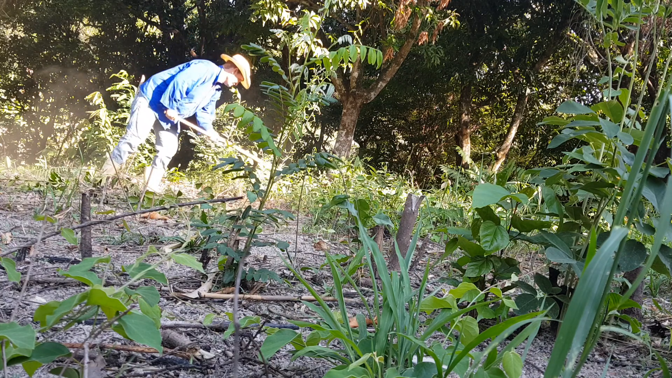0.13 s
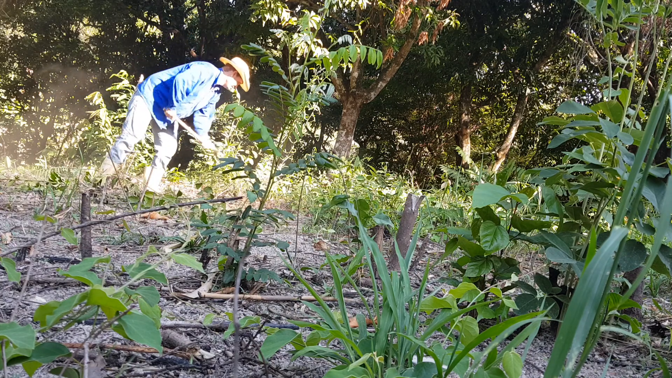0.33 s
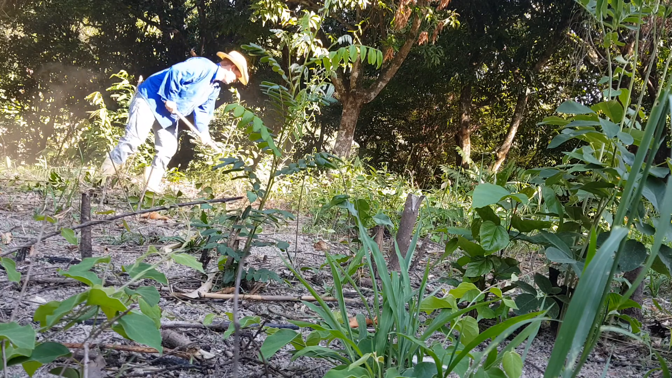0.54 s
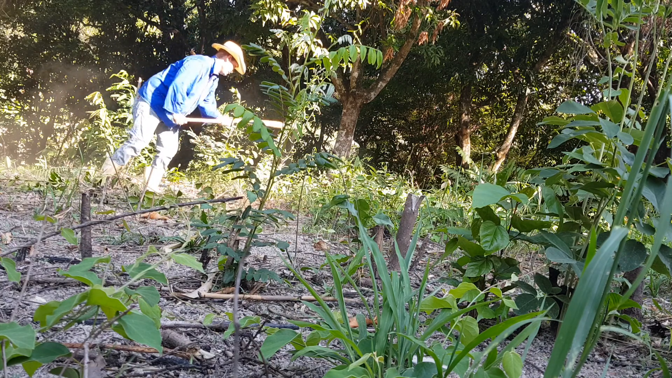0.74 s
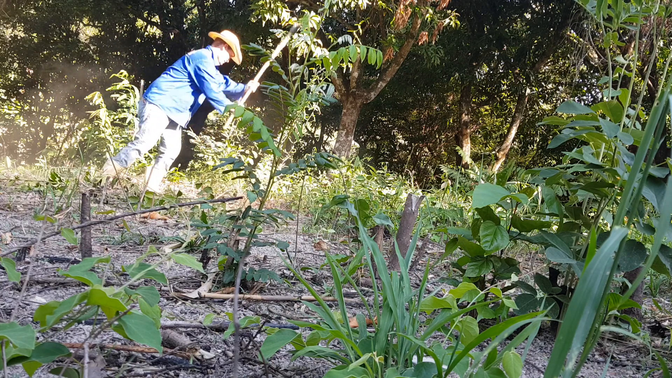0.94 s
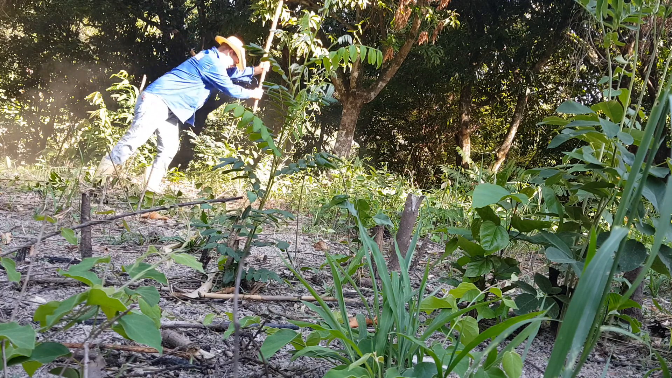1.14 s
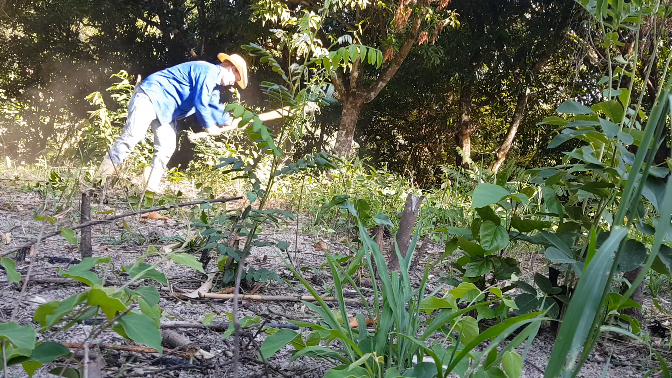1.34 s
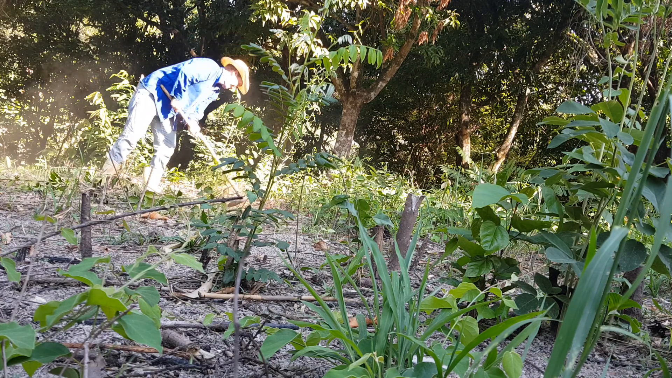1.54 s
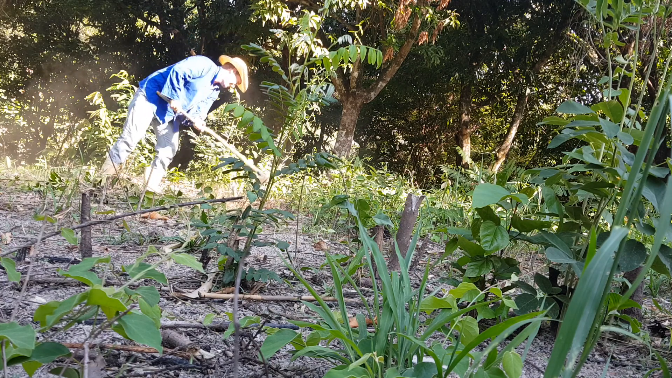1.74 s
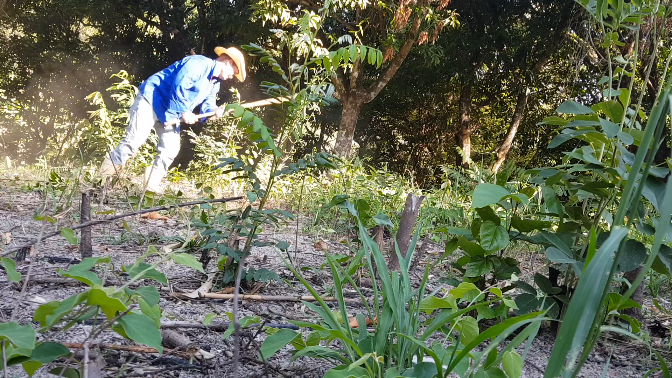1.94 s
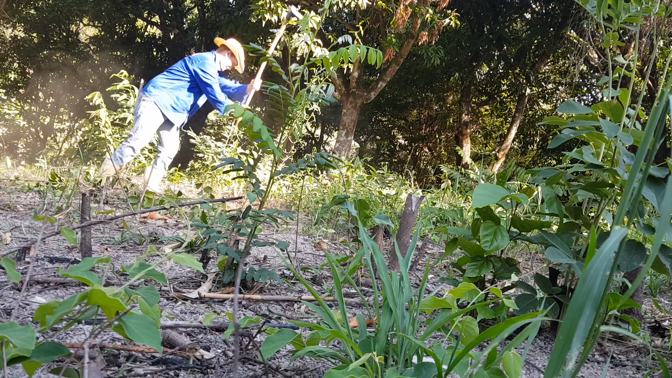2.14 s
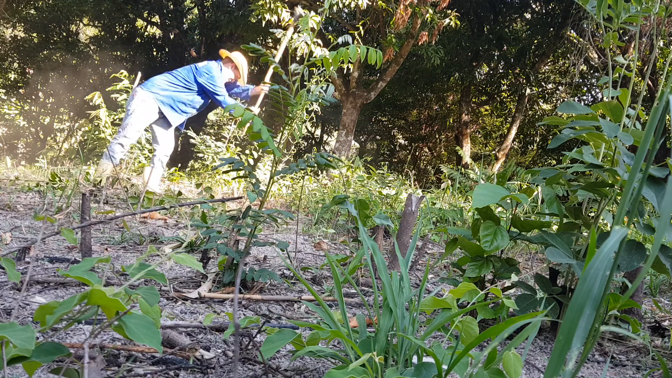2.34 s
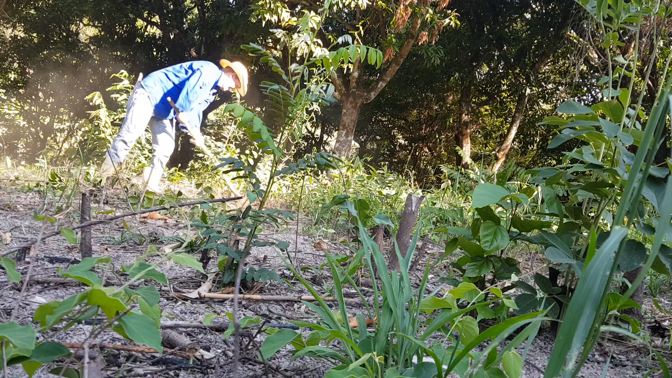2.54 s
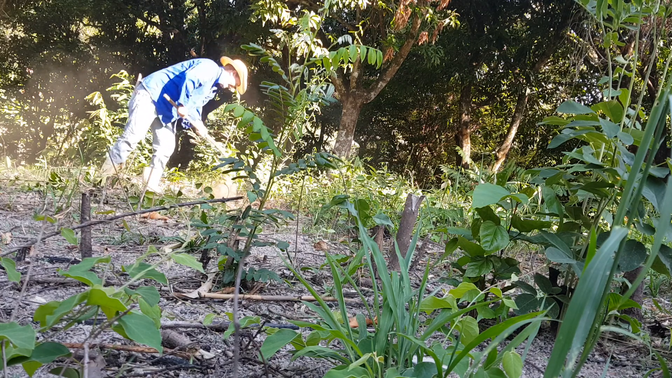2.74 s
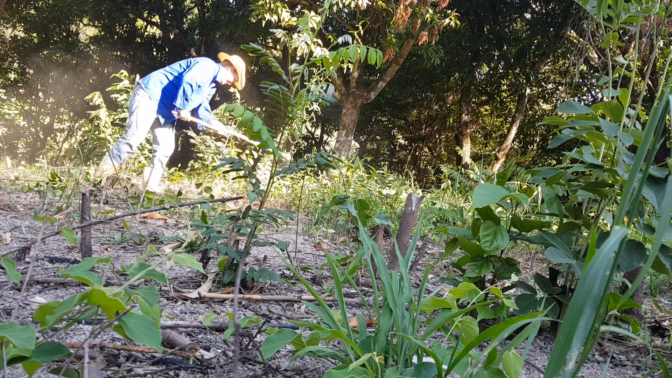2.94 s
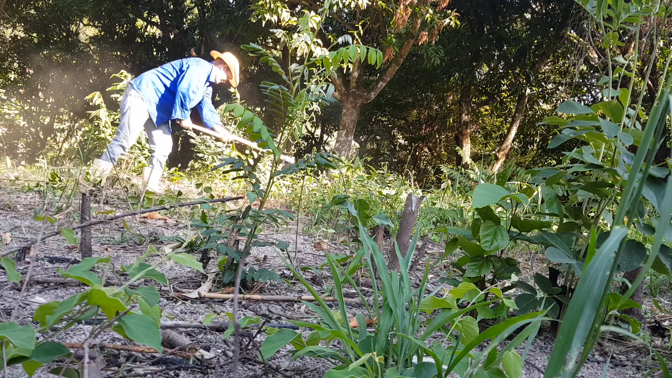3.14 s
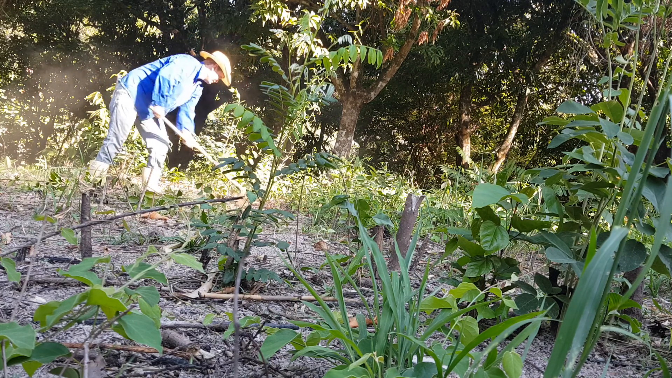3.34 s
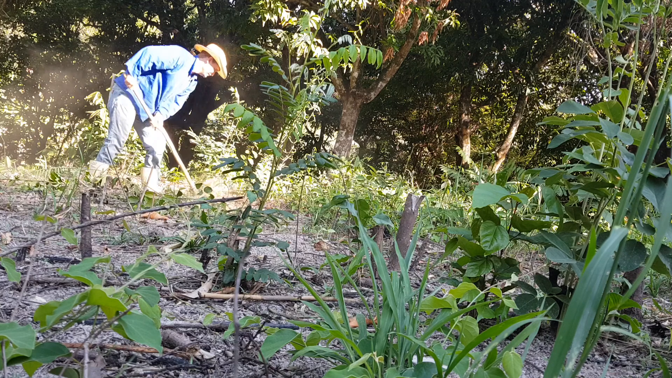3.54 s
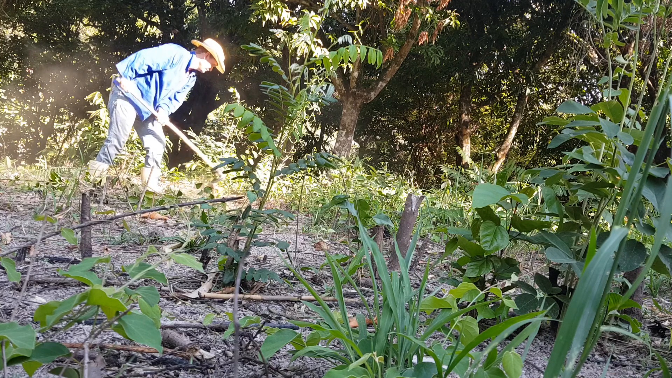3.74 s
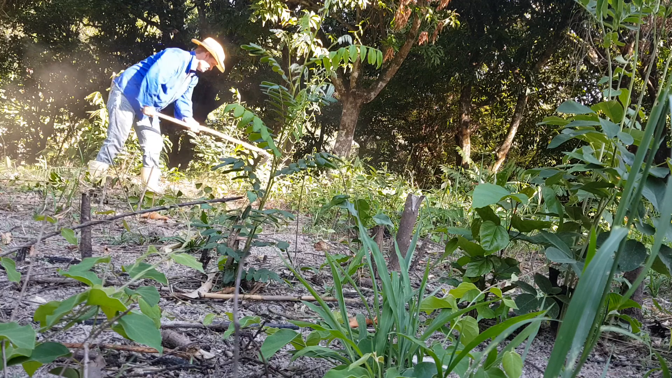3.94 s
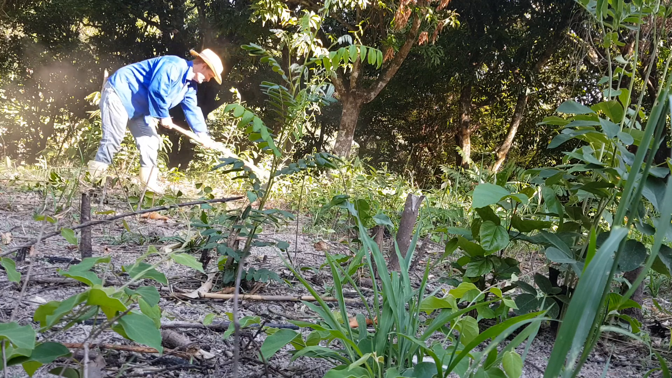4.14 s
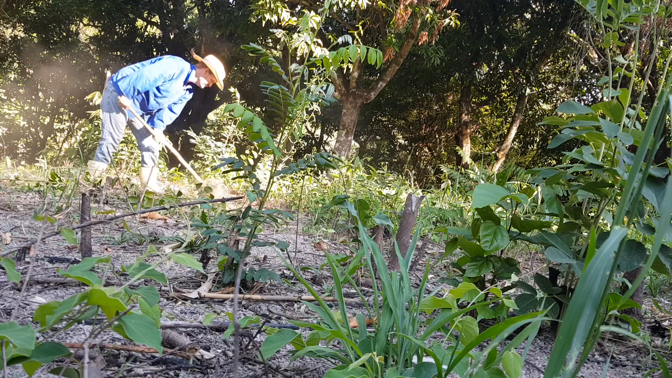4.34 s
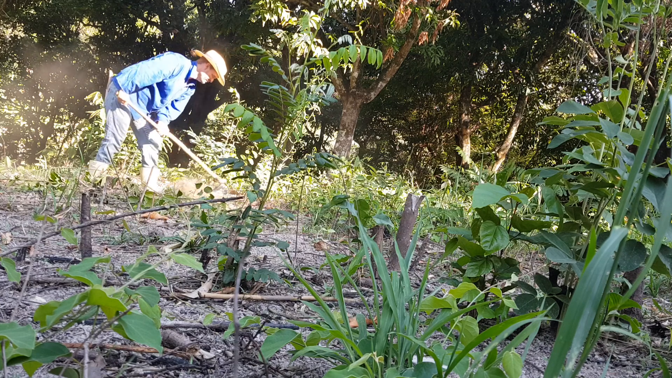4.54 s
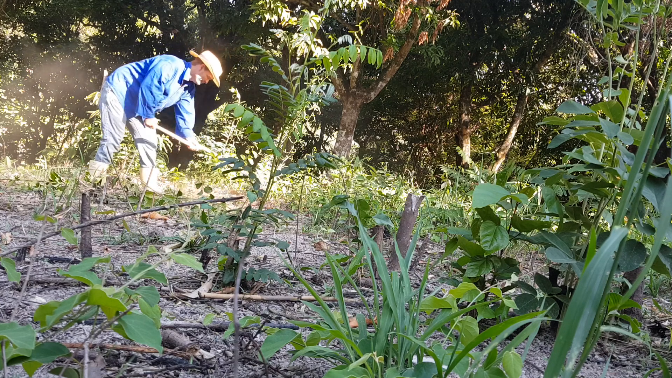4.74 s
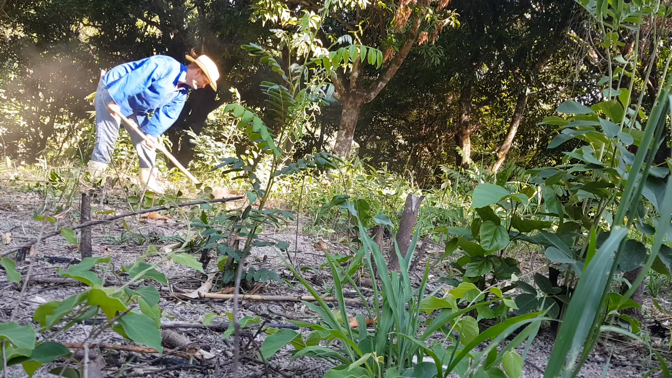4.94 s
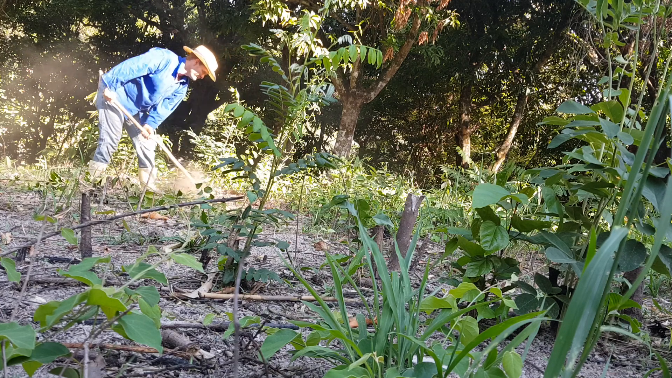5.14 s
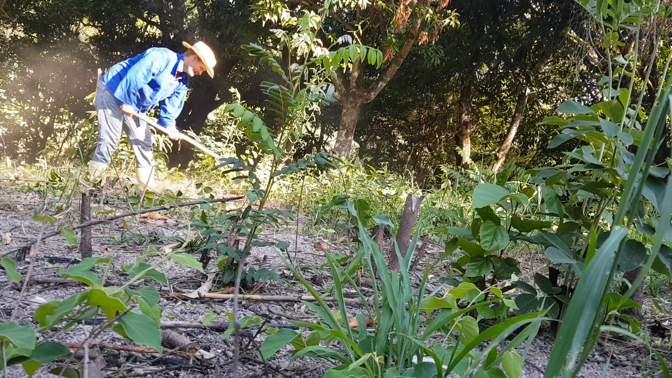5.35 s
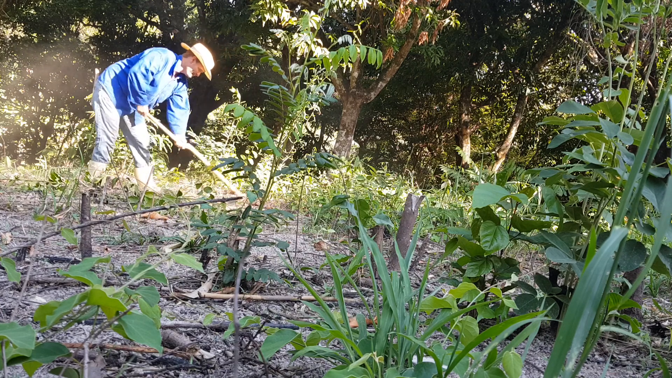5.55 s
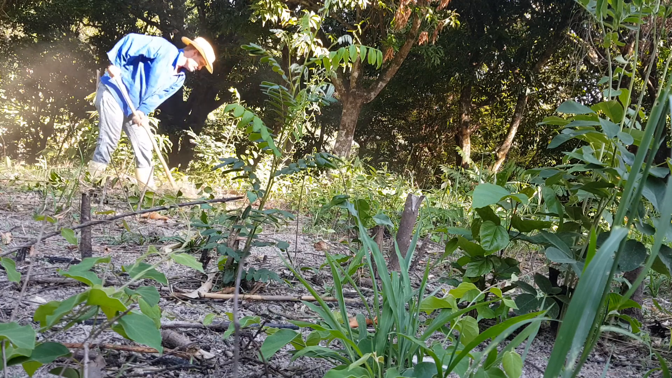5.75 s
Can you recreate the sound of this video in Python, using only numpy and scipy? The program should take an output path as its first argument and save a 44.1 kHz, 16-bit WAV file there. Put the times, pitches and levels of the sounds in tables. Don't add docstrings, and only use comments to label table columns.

```python
import sys
import numpy as np
from scipy import signal
from scipy.fft import rfft, irfft, next_fast_len
from scipy.io import wavfile
from scipy.ndimage import uniform_filter1d

SR = 44100
rng = np.random.default_rng(int(sys.argv[2]) if len(sys.argv) > 2 else 0)


def wav_record(signal):
    frames = np.transpose(np.atleast_2d(signal))
    bounded = np.clip(frames, -1, 1)
    quanta = np.round(bounded * 32767).astype(np.int16)
    wavfile.write(sys.argv[1], SR, quanta)


def rack_gain(trim_db):
    fader = np.asarray(trim_db, float)
    return 10 ** (fader / 20)


N = 259308
T = np.arange(N) / SR
COARSE = 16

# start_s, peak_db, dullness_db, rise_ms, fade_s
BLOWS = [(.375, -43, -32, 3, 0.04), (0.393, -33, -13, .8, 0.06), (1.4334, -38.5, -10, 0.7, 0.27),
         (1.4403, -26.5, 0, 0.16, 0.0095), (1.45, -22, -10, 2.2, 0.039), (1.456, -11.5, -5, 0.4, 0.017),
         (2.549, -37, -29, 1.2, 0.09), (2.5698, -8, -6, 6.6, 0.036), (2.5759, -16, 1.5, 0.51, 0.027),
         (3.3165, -28, -24, .5, 0.025), (3.323, -32.5, -15, .6, 0.057), (3.33, -27, -9, 0.71, 0.038),
         (3.3511, -32.5, 6, 0.54, 0.035), (3.3908, -27, 2.5, 0.75, 0.014), (4.809, -42.5, -11, 0.82, 0.042),
         (4.922, -34, -9.5, 2.3, 0.099), (4.262, -62, -24, 5.4, .08), (5.627, -39.5, -22, 0.5, 0.028),
         (5.739, -44, -35, 1.3, 0.025)]
# pitch_hz, level_db, fade_s
BLADE = [(942, -4, .06), (1514, -3, .07), (2084, -4, .07), (2291, 0, .08), (3956, -3, .06), (4518, -4, .08),
         (5453, -6, .05), (6821, -5, .05), (10500, -7, .03), (12340, -8, .03)]
RING_DB, RING_PER_DB = -5, 4.2

# start_s, peak_db,
# pitch_hz, fade_s
TICKS = [(0.3537, -46, 11600, .008), (0.37, -40, 6300, 0.014), (0.6, -44, 10800, 0.0073),
         (1.441, -27, 4600, 0.0059), (1.445, -51, 12100, .008), (1.455, -16.5, 12400, 0.049),
         (2.5525, -29, 5500, 0.011), (2.574, -30, 11200, 0.055), (2.81, -41, 10600, 0.018),
         (3.2975, -47, 11000, 0.007), (3.3949, -32.5, 11600, 0.03), (3.422, -39, 11000, .01),
         (5.3305, -36, 6300, 0.032), (5.4535, -32, 5000, 0.021), (5.424, -40, 6500, .015),
         (5.484, -50, 5400, .015), (5.7799, -31, 5600, 0.036), (5.7812, -35.5, 9800, 0.013),
         (5.782, -34, 14500, .02), (3.3072, -45, 10500, 0.0045), (4.926, -38.5, 10300, .02),
         (5.628, -54, 11000, 0.024), (2.576, -18.5, 2180, 0.036), (2.577, -28, 970, 0.034),
         (2.584, -31.5, 495, 0.019), (1.462, -32, 200, .03), (1.456, -31.5, 830, 0.016),
         (1.458, -31.5, 444, 0.031)]

# start_s, level_db, first_hz, fade_s, hollow_knock_db
THUMPS = [
    (0.406, -44, 94, 0.31, -3),
    (1.458, -24, 133, 0.25, -3),
    (1.582, -48, 76.5, 0.44, -30),
    (2.581, -26, 113, 0.15, 0),
    (2.719, -56, 75.6, 0.34, -23),
    (3.35, -28, 99, 0.067, -23),
    (4.285, -45, 89, 0.31, -30),
    (4.958, -59, 110, 0.16, -9),
    (5.677, -54.5, 111, 0.069, 6.5),
]
GROUND_HZ = 58.6
KNOCK_HZ, KNOCK_FADE_S = 230, 0.035

# start_s, crumbs_db, clods_db, rumble_db, hold_s
CUTS = [(.398, -40, -54, -40, 0.016), (1.465, -37.5, -40, -34.5, 0.019), (2.581, -35, -37.5, -37, 0.0077),
        (3.331, -34.5, -47.5, -37, 0.0042), (3.41, -62, -60.5, -67.5, 0.16),
        (4.262, -44.5, -50, -50.5, 0.03), (4.318, -70, -63.5, -68, 0.082), (4.933, -49.5, -52.5, -56, .003),
        (4.948, -53.5, -49, -56, 0.07), (4.992, -48, -67, -58.5, 0.046), (5.634, -50.5, -60, -80.5, .02),
        (5.66, -64, -59, -64, 0.048)]
CUT_RISE_S = 0.053
CUT_FADE_S = [0.18, 0.22, .22, 0.24]
CUT_DELAY_S = [0., .003, .008, .022]
CUT_LEAVES_DB = -2

# start_s (full level reached), crumbs_db,
# rise_s (over 60 dB), fade_s, coarseness_db
SHOWERS = [(.02, -51.5, 0.45, 0.2, -11), (.114, -68, 7, 2, 1), (.372, -50.5, 0.04, 0.4, -9.5),
           (.608, -58.5, 1.5, 0.26, -4.5), (.692, -60.5, 0.4, 0.33, -3), (1.666, -54, 1, 1.01, -8),
           (1.88, -66.5, 9, 0.53, 1), (2.65, -58.5, 4.5, 0.38, -6.5), (2.816, -53, 1, 1.27, -6),
           (3.064, -65, 4, 0.91, -3.5), (3.285, -64.5, 0.1, 1.1, 4.5)]
# start_s, crumbs_db, rise_s (over 60 dB), fade_s, coarseness_db
RAKES = [(3.39, -56.5, 4.9, 0.74, 5.5), (3.49, -44, 0.5, 0.74, -26), (3.535, -47, 0.3, 0.87, -2),
         (3.731, -54.5, 1, 1.52, -3.5), (4.111, -59, 0, 1.14, -1.5), (4.34, -50, 2.3, 2.35, -4.5),
         (4.52, -59.5, 4.5, 1.3, -14), (4.695, -50.5, 1.5, 0.32, -4.5), (4.822, -56, 0, 1.2, -3),
         (5.08, -56, 11, 0.9, -5.5), (5.218, -53, 0.5, 0.64, -10), (5.285, -51, 0.1, 1.2, -2),
         (5.42, -51, 1.5, 0.49, 0), (5.65, -64.5, -0.3, .8, 8), (5.785, -49, 0.6, 1.06, -2)]
CLODS_DB, CLODS_PER_COARSE, RUMBLE_DB = -15, 1.4, -27

# start_s, level_db
PUFFS = [(.988, -65), (1.335, -68), (2.076, -67), (2.434, -65.5), (3.157, -65), (4.25, -64.5)]
PUFF_RISE_S, PUFF_FADE_S, PUFF_CRUMBS_DB = 0.8, 0.58, -12.5

# pitch_hz, level_db
CRUMBS = [(6000, -40), (7200, -2.5), (7900, -9), (8800, -7.5), (10000, -2.5), (12500, 0), (15000, 3),
          (16100, -17.5)]
# pitch_hz, level_db
LEAVES = [(1300, -54), (2000, -6), (3200, -1.5), (4500, 4), (6200, 4.5), (7000, 1), (7500, -19),
          (8400, -51)]
# pitch_hz, level_db
CLODS = [(110, -3), (200, 1), (300, 0), (600, -6), (1000, -3), (1600, -0.8), (2300, 0), (4500, -4.5),
         (7000, -27)]
# pitch_hz, level_db
RUMBLE = [(25, -30), (45, 6.5), (72, 1.5), (110, 1.5), (200, -18), (350, -46.5)]

# pitch_hz, width_hz, level_db, left_minus_right_db, throb (0 to 1)
CRICKETS = [(3035, 50, -72, -6.5, 0), (3352, 40, -67.5, -1, 0.27), (3443, 110, -71.5, -4.5, 0.5),
            (3560, 22, -69.5, -7.5, 0.26), (5340, 43, -76, -8, 0.03), (5150, 180, -83, -8.7, 0)]
# pitch_hz, level_db
HAZE = [(2300, -20), (2900, -5), (3700, 3), (4300, 4.5), (5200, -6), (6400, -3), (7000, -19), (7350, -42),
        (8000, -48)]
# time_s, level_db
HAZE_LEVEL = [(0, -73.5), (.4, -59.5), (.8, -71), (1.05, -64.5), (1.2, -64), (1.4, -67.5), (1.6, -61.5),
              (1.9, -72), (2.1, -62.5), (2.25, -69.5), (2.45, -66.5), (3.1, -63), (3.3, -64), (4., -67),
              (4.6, -62), (5.35, -63.5), (5.88, -66.5)]
# start_s, length_s, pitch_hz, level_db
CHIRRS = [(1.05, .16, 5150, -69), (1.24, 0.099, 4950, -69), (2.043, .13, 4550, -74), (2.34, .14, 4200, -69),
          (3.068, .11, 4270, -62.5), (5.437, 0.06, 4280, -61)]
CHIRR_WIDTH_HZ = 350

# start_s, length_s, first_hz, last_hz, level_db
BIRD = [(.0, 0.077, 2230, 1674, -86), (0.45, .075, 2844, 2126, -68), (0.548, 0.099, 2480, 2090, -91),
        (0.95, 0.07, 2690, 2093, -72.5), (1.058, 0.1, 2330, 1864, -85.5), (1.924, 0.18, 2476, 1680, -78),
        (2.427, 0.17, 2880, 2570, -76)]
BIRD_PAN_DB = -5.5

# pitch_hz, level_db
AIR = [(25, -27.5), (45, -1), (86, -1.5), (300, -11.5), (900, -17.5), (2000, -24.5), (6800, -24.5),
       (7300, -46.5), (8800, -31.5), (12300, -17), (16000, -21)]
AIR_DB = -73

# pitch_hz, level_db
SHADOW = [(300, 1.2), (1000, -1.1), (4500, -3), (6500, -2.5), (8000, 5.5), (11000, 6), (15000, 0)]
PORT_LAG = 4
TOP_HZ = 16150


def blows():
    bright, dull, jolt = np.zeros((3, N))
    for start_s, db, dull_db, rise_ms, fade_s in BLOWS:
        i = int(start_s * SR)
        t = T[:min(SR // 3, N - i)]
        rise = (1 - np.exp(-t / max(rise_ms / 1000, 1e-4))) ** 2
        shape = rack_gain(db) * rise * fall(t, max(fade_s, .004))
        bright[i:i + len(t)] += shape
        dull[i:i + len(t)] += shape * rack_gain(dull_db)
        jolt[i:i + len(t)] += shape * rack_gain(RING_DB + RING_PER_DB * db)
    crush = grit(spread_db=3.0, alike=0.69)
    crunch = bright * unit(colour(crush, CRUMBS)) * rack_gain(-13.0)
    crunch = crunch + bright * unit(colour(crush, LEAVES)) * rack_gain(-5.5)
    knock = dull * unit(colour(grit(spread_db=3.0, alike=0.85), CLODS)) * rack_gain(-6.0)
    shake = jolt * grit(spread_db=1.5, alike=1.0)
    steel = sum(rack_gain(db) * ring(shake, hz, fade_s) for hz, db, fade_s in BLADE)
    near = crunch + knock + steel
    return near + rack_gain(-7) * trees(near, 0.5)


def ticks():
    out = np.zeros(N)
    t = T[:SR // 25]
    noises = rng.standard_normal((len(TICKS), len(t)))
    for (start_s, db, hz, fade_s), noise in zip(TICKS, noises):
        snap = np.diff(noise * fall(t, fade_s), 2, prepend=[0, 0])
        burst = ring(ring(snap, hz, 6. / hz), hz, 6. / hz)
        i = int(start_s * SR)
        out[i:i + len(t)] += rack_gain(db) * burst / np.abs(burst).max()
    near = np.array([out, np.roll(out, PORT_LAG)])
    return near + rack_gain(-8) * colour(trees(near, .22), [(500, -20), (2500, 0)])


def thumps():
    out = np.zeros(N)
    for start_s, db, first_hz, fade_s, knock_db in THUMPS:
        i = int(start_s * SR)
        t = T[:min(SR // 2, N - i)]
        hz = GROUND_HZ + (first_hz - GROUND_HZ) * np.exp(-t / 0.0216)
        swing = np.sin(2 * np.pi * np.cumsum(hz) / SR)
        wave = (1 - np.exp(-t / 0.0056)) * fall(t, fade_s) * swing
        knock = rack_gain(knock_db) * fall(t, KNOCK_FADE_S) * np.sin(2 * np.pi * KNOCK_HZ * t)
        out[i:i + len(t)] += rack_gain(db) * (wave + knock)
    return out * rack_gain(1.2 * walk(40))


def soil():
    fine, dry_leaf, heavy, deep = loads()
    patchy_db = 1.3 * walk(45)
    crumbs = unit(colour(grit(spread_db=2.0, alike=0.13), CRUMBS))
    crumbs = crumbs + rack_gain(-13.5) * colour(snaps(10160, 14900, rate=300, fade_s=0.0036), CRUMBS)
    leaves = unit(colour(grit(spread_db=-0.5, alike=0.12), LEAVES))
    leaves = leaves + rack_gain(-9.0) * colour(snaps(2280, 6670, rate=200, fade_s=0.0079), LEAVES)
    clods = unit(colour(grit(spread_db=1.5, alike=0.7), CLODS))
    rumble = unit(colour(rng.standard_normal(N), RUMBLE))
    bright = rack_gain(patchy_db - 1.18) * fine * crumbs + rack_gain(patchy_db + 3.5) * dry_leaf * leaves
    return bright + rack_gain(2.07 * walk(45) + 0.5) * heavy * clods + rack_gain(-4.5) * deep * rumble


def loads():
    clock = T[::COARSE]
    power = np.full((4, len(clock)), 1e-12)
    for start_s, crumbs_db, clods_db, rumble_db, hold_s in CUTS:
        leaves_db = (crumbs_db + clods_db) / 2 + CUT_LEAVES_DB
        layers_db = crumbs_db, leaves_db, clods_db, rumble_db
        power += [swell(start_s + delay_s, db, CUT_RISE_S, fade_s, hold_s) ** 2
                  for db, fade_s, delay_s in zip(layers_db, CUT_FADE_S, CUT_DELAY_S)]
    for start_s, db, rise_s, fade_s, coarse_db in SHOWERS + RAKES:
        clods_db = CLODS_DB + CLODS_PER_COARSE * coarse_db
        shares = rack_gain(np.array([0, coarse_db, clods_db, RUMBLE_DB]))
        thrown_s = max([0] + [cut[0] for cut in CUTS if cut[0] < start_s])
        landing = swell(start_s, db, rise_s, fade_s) * (clock >= thrown_s)
        power += np.outer(shares, landing) ** 2
    for start_s, db in PUFFS:
        puff = swell(start_s, db, PUFF_RISE_S, PUFF_FADE_S)
        power[:2] += np.outer([rack_gain(PUFF_CRUMBS_DB), 1], puff) ** 2
    return [np.interp(T, clock, gain) for gain in np.sqrt(power)]


def snaps(low_hz, high_hz, rate, fade_s):
    out = np.zeros((2, N))
    for hz in np.geomspace(low_hz, high_hz, 7):
        when, size = rng.random((2, 2, N), dtype=np.float32)
        clicks = (when < rate / SR) * (2 * size - 1) ** 3
        out += ring(clicks, hz, fade_s)
    return unit(out)


def insects():
    haze_db = np.interp(T, *np.transpose(HAZE_LEVEL)) + 0.63 * walk(19)
    out = rack_gain(haze_db) * unit(colour(rng.standard_normal((2, N)), HAZE))
    for hz, width_hz, db, pan_db, throb in CRICKETS:
        line = unit(ring(rng.standard_normal((2, N)), hz, 4.2 / width_hz))
        beat_hz = 27 + 2.586 * walk(2.4)
        beat = 1 + throb * np.sin(2 * np.pi * np.cumsum(beat_hz) / SR)
        drift_db = 1.7 * walk(1.3) + 0.34 * walk(20)
        out += rack_gain(db + drift_db + np.array([[pan_db], [-pan_db]]) / 2) * beat * line
    return out


def chirrs():
    out = np.zeros((2, N))
    noises = rng.standard_normal((len(CHIRRS), 2, SR // 4))
    for (start_s, length_s, hz, db), noise in zip(CHIRRS, noises):
        i, size = int(start_s * SR), min(int(length_s * SR), SR // 4)
        hiss = unit(ring(noise, hz, 4.8 / CHIRR_WIDTH_HZ))[:, :size]
        out[:, i:i + size] += rack_gain(db) * np.sin(np.pi * np.arange(size) / size) * hiss
    return out


def bird():
    out = np.zeros((2, N))
    pan_db = np.array([[BIRD_PAN_DB], [-BIRD_PAN_DB]]) / 2
    for start_s, length_s, first_hz, last_hz, db in BIRD:
        i = int(max(start_s, 0) * SR)
        along = T[:int(length_s * SR)] / length_s
        hz = last_hz + (first_hz - last_hz) * (1 - along) ** 0.8
        turn = 2 * np.pi * np.cumsum(hz) / SR
        whistle = np.sin(turn) + rack_gain(-9.5) * np.sin(2 * turn)
        note = np.sin(np.pi * along ** 1.25) ** 0.4 * whistle
        out[:, i:i + len(along)] += rack_gain(db + pan_db) * note
    out = out * (1.7 + 0.7 * walk(180))
    return out + rack_gain(4) * trees(out, 0.8)


def air():
    mid, left, right = rng.standard_normal((3, N))
    shared = colour(mid, [(150, -2.0), (1200, -14.0)])
    hush = unit(colour(shared + np.array([left, right]), AIR))
    return rack_gain(AIR_DB + 0.26 * walk(8.9)) * hush


def trees(x, fade_s):
    t = T[:SR // 2]
    tail = rng.standard_normal((2, len(t))) * fall(t, fade_s) * (t > .008)
    tail = tail / np.sqrt(np.sum(tail ** 2, axis=1, keepdims=True))
    return signal.fftconvolve(x, tail, axes=1)[:, :N]


def grit(spread_db, alike):
    size_db = np.clip(spread_db, 0, 7) * rng.exponential(size=N // 8 + 1)
    size = rack_gain(size_db).repeat(8)[:N]
    direct, left, right = size * rng.standard_normal((3, N))
    alike = np.clip(alike, 0, 1)
    straight = np.array([direct, np.roll(direct, PORT_LAG)])
    return np.sqrt(alike) * straight + np.sqrt(1 - alike) * np.array([left, right])


def swell(start_s, db, rise_s, fade_s, hold_s=0.):
    t = T[::COARSE]
    climb = np.maximum((start_s - t) / max(rise_s, .01), 0)
    decay = np.maximum((t - start_s - hold_s) / max(fade_s, .02), 0)
    return rack_gain(db - 60 * climb - 60 * decay)


def ring(x, hz, fade_s):
    r = np.exp(-np.log(1000) / (fade_s * SR))
    turn = 2 * np.pi * hz / SR
    return signal.lfilter([np.sin(turn) * np.sqrt(1 - r * r)], [1, -2 * r * np.cos(turn), r * r], x)


def fall(t, fade_s):
    return np.exp(-np.log(1000) * t / fade_s)


def walk(rate):
    k = int(SR / rate)
    steps = np.repeat(rng.standard_normal(N // k + 1), k)
    return unit(uniform_filter1d(uniform_filter1d(steps, k), k)[:N])


def colour(x, points):
    hz, db = np.transpose(points)
    size = next_fast_len(N)
    bins_hz = np.arange(size // 2 + 1) * SR / size
    gain = rack_gain(np.interp(np.log(bins_hz + 1), np.log(hz), db))
    return irfft(rfft(x, size) * gain, size)[..., :N]


def unit(x):
    return x / np.sqrt(np.mean(x ** 2))


def scene():
    left, right = blows() + ticks() + soil()
    mid = (left + right) / 2
    side = colour((left - right) / 2, [(120, -17.0), (700, 0.5)])
    hoe = np.array([colour(mid + side, SHADOW), mid - side])
    return hoe + thumps() + insects() + chirrs() + bird() + air()


def low_pass(x):
    return signal.sosfilt(signal.butter(12, 16810, fs=SR, output="sos"), x)


def record(dry):
    trimmed = signal.sosfilt(signal.butter(2, 42, "highpass", fs=SR, output="sos"), dry)
    mix = signal.sosfilt(signal.ellip(8, .2, 70, TOP_HZ, fs=SR, output="sos"), trimmed)
    return low_pass(mix)


dry = scene()
out = record(dry)
wav_record(out)
```